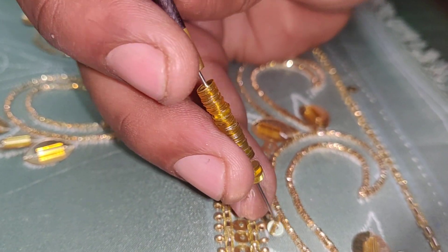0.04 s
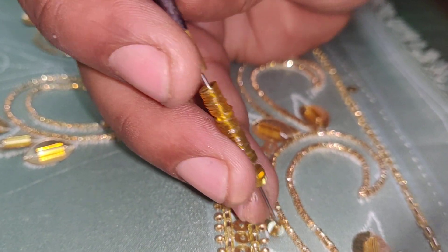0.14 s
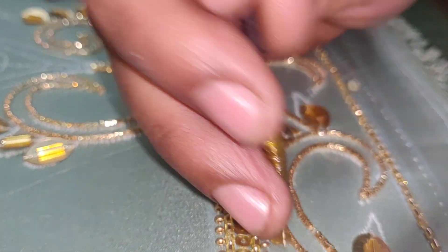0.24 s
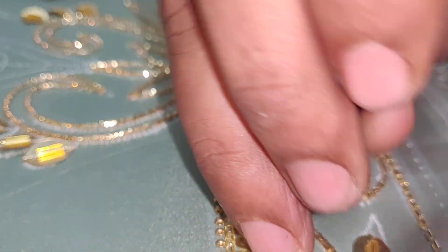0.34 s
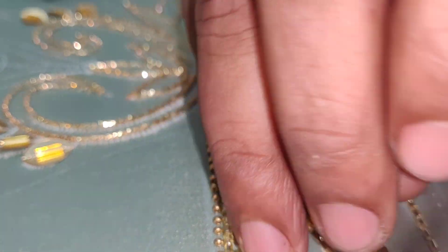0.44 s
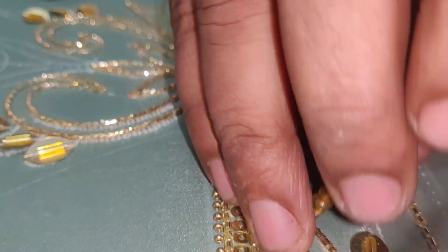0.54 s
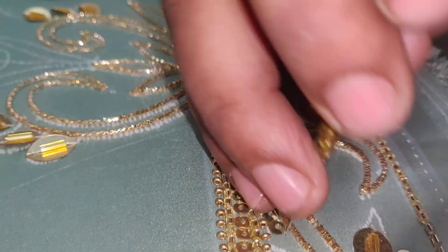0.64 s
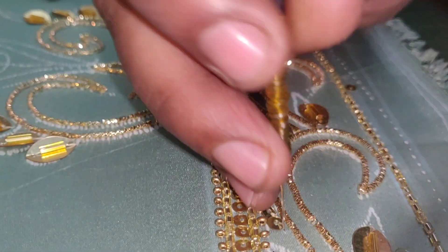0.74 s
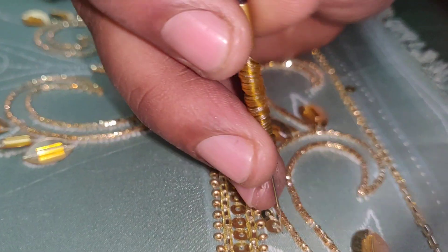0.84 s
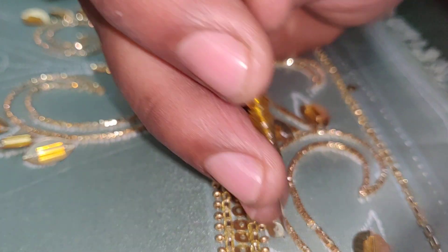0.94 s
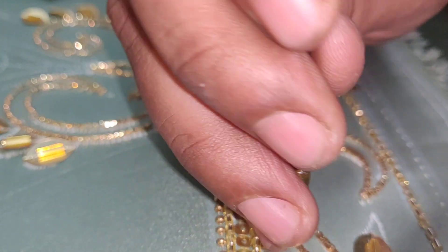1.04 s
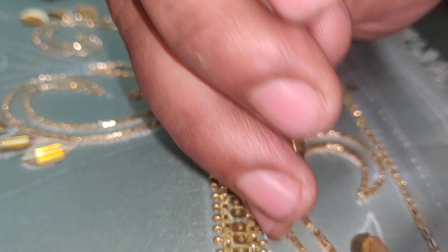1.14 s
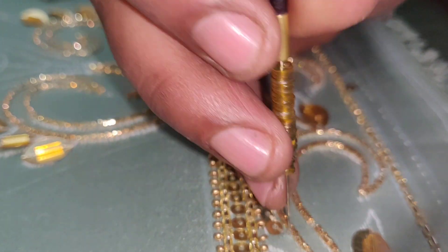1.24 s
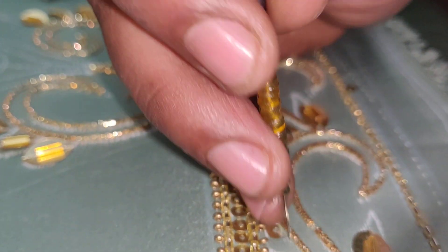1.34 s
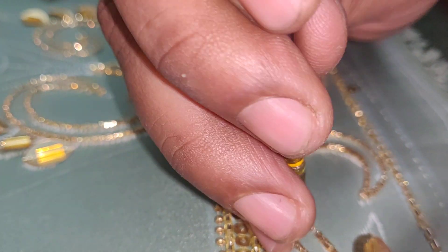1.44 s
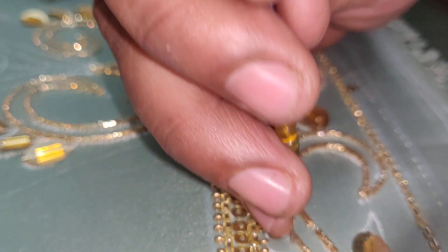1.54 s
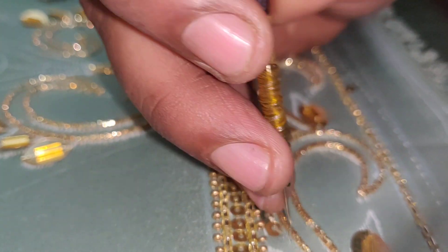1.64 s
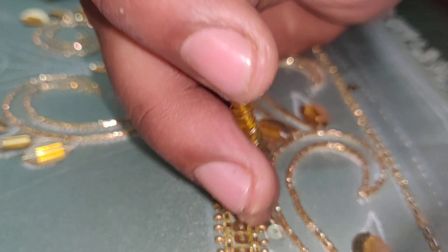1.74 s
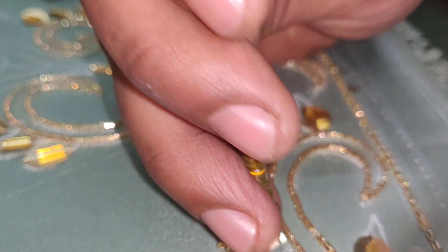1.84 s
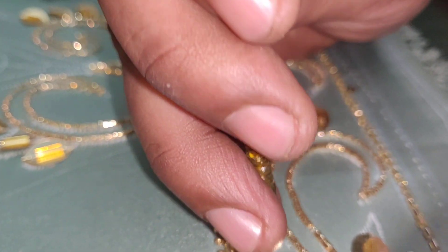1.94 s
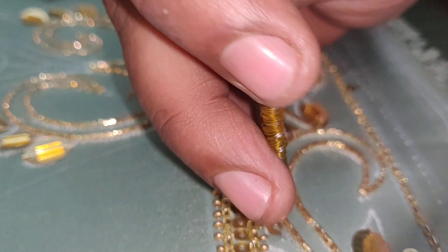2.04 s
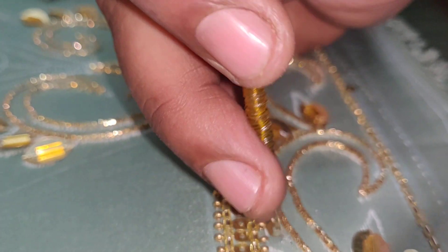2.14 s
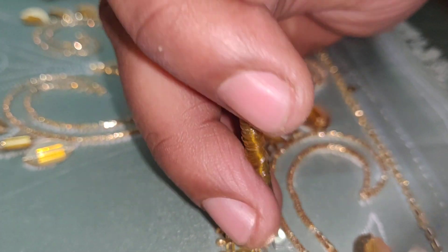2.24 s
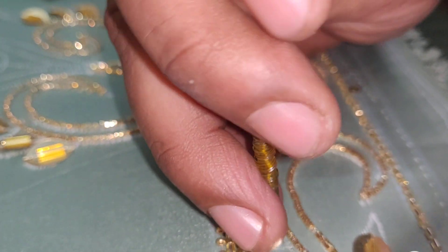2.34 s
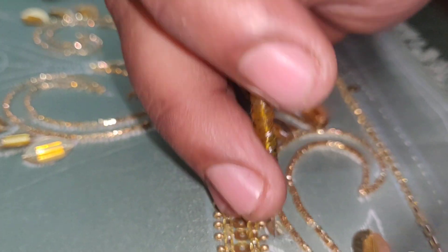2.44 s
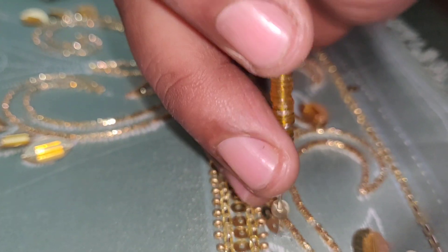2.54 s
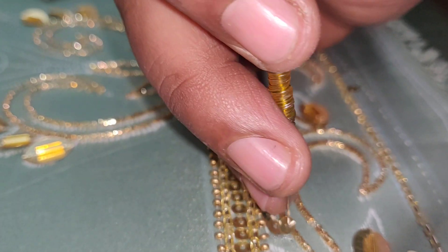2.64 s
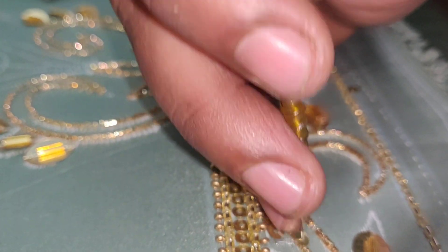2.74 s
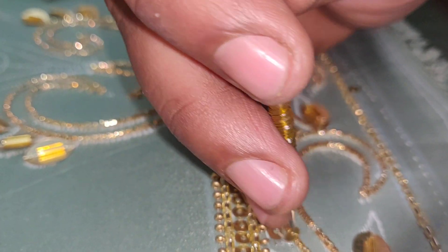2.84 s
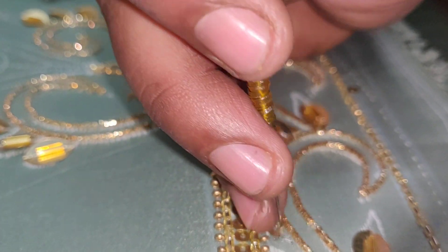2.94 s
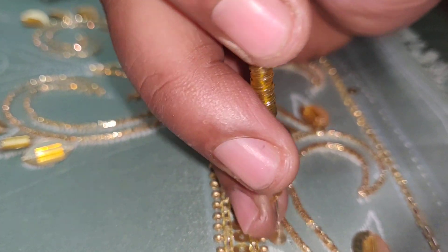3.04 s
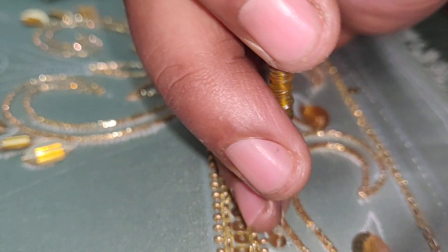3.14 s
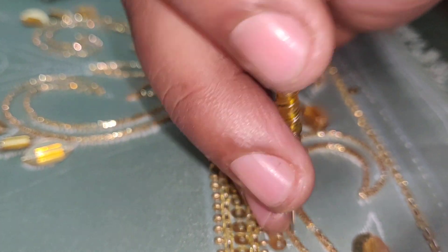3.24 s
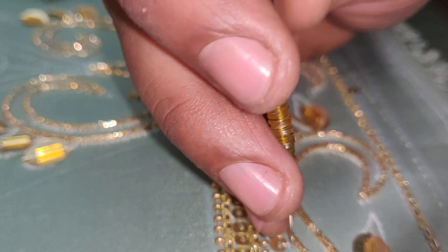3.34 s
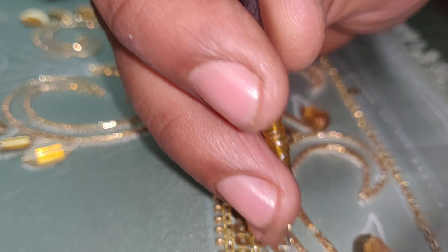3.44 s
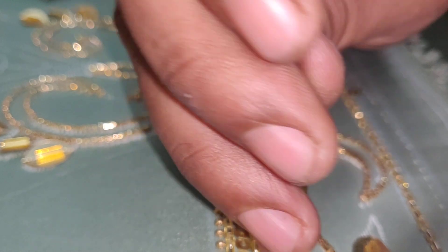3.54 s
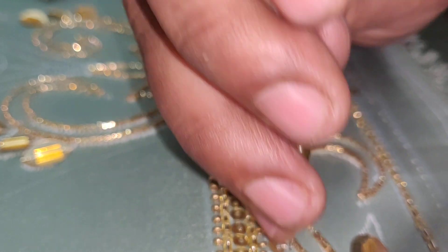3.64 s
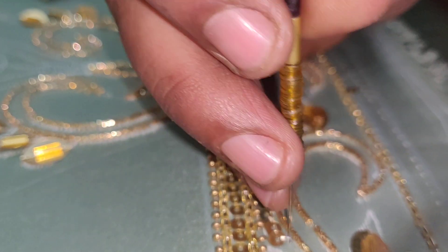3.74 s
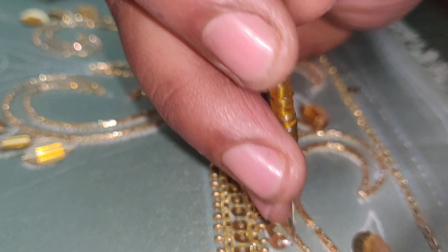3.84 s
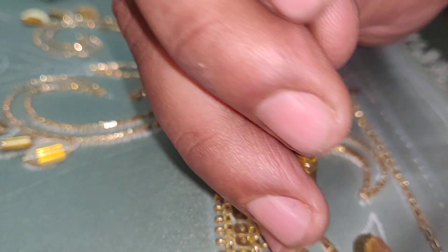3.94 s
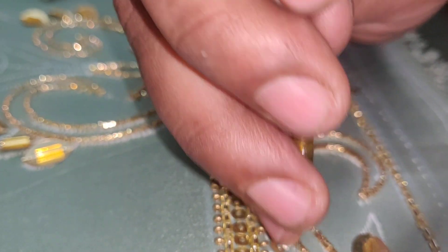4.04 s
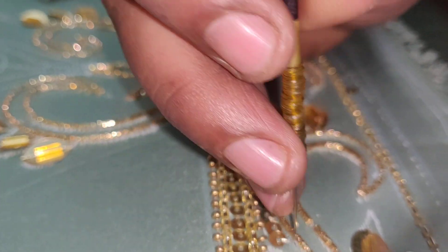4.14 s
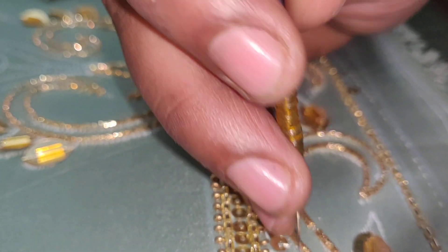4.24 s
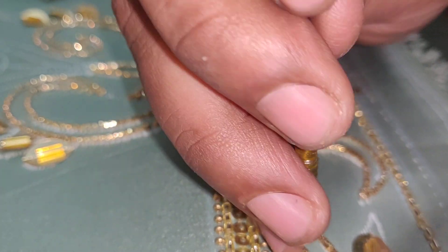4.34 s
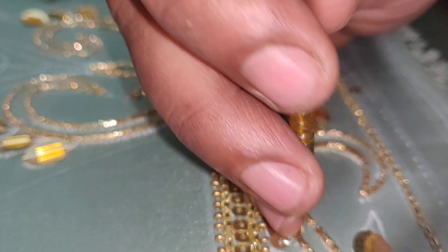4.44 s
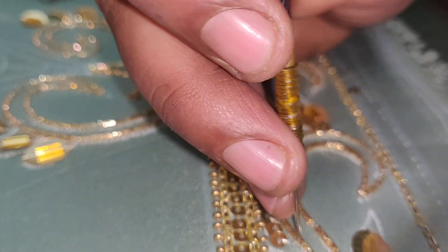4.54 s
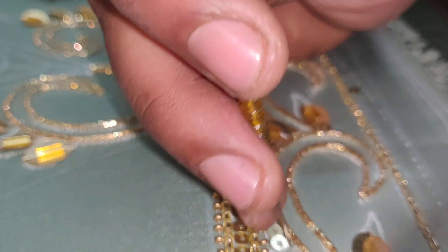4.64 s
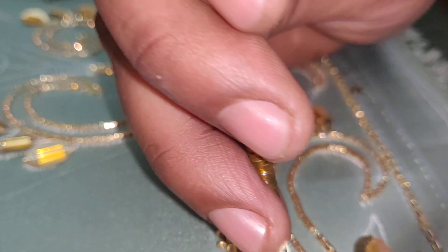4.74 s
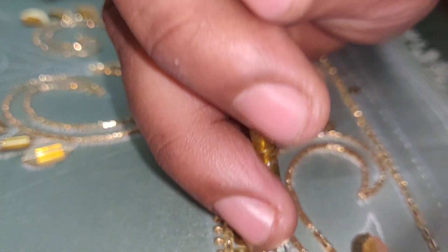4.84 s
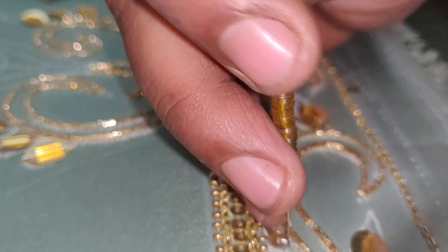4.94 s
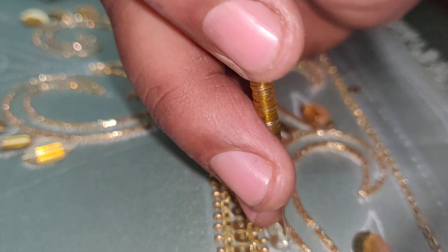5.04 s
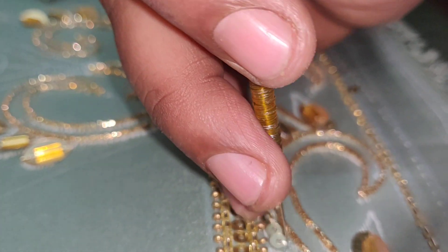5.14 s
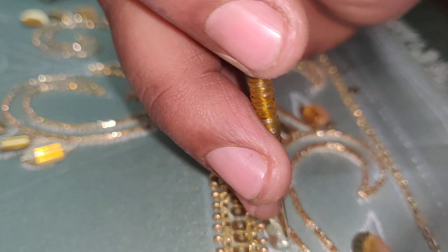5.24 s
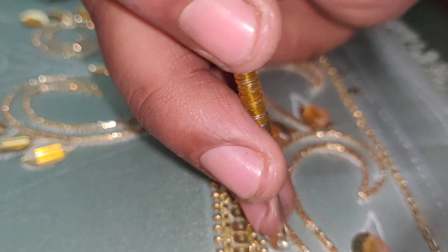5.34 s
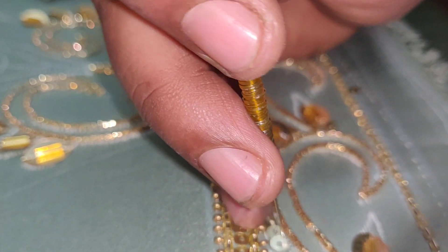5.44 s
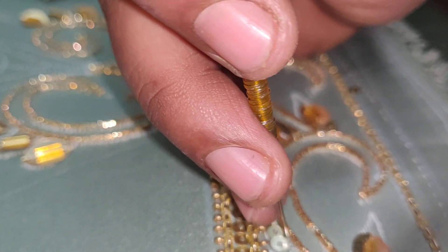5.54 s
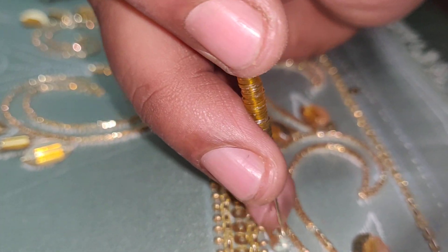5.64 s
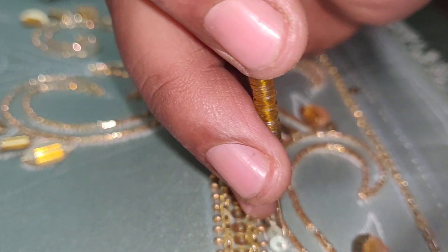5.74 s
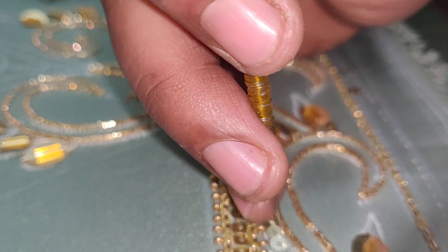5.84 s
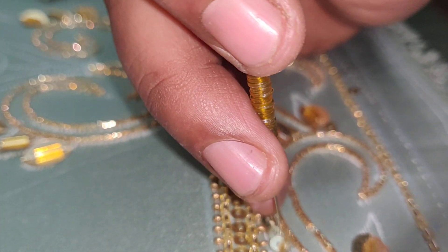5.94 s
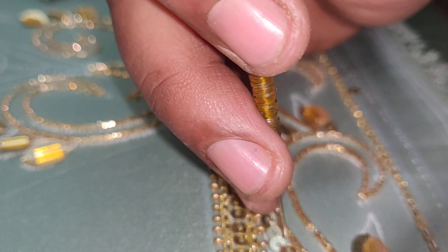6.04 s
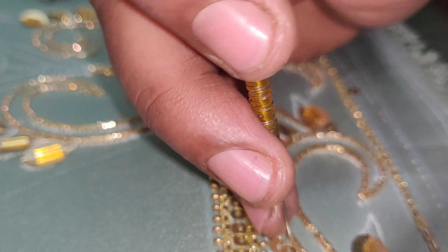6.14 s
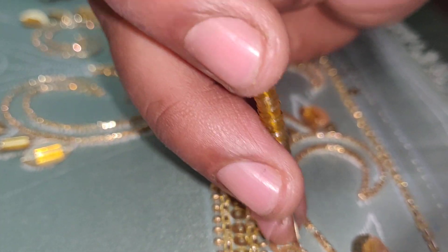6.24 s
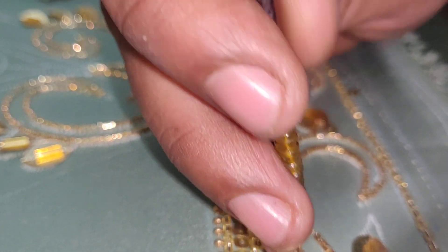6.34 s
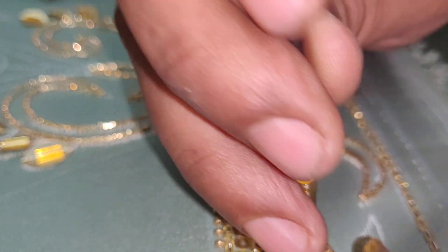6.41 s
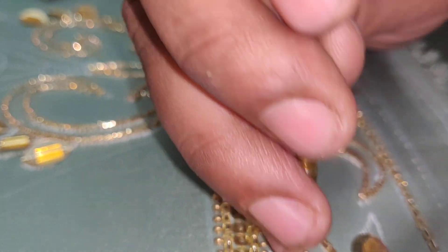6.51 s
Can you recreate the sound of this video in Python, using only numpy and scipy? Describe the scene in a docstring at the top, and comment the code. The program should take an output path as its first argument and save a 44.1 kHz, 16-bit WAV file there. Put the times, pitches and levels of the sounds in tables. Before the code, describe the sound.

A hooked needle works on tightly stretched, sequined cloth right beside a phone, slightly left, in a quiet small room. A hard snap with a drum-like thump comes at 0.2 s, then scratchy finger rubs and thread hiss. From 0.7 to 1.8 s bright clicks arrive irregularly, often doubled, each with a dry beady rattle and low springy thud. Tiny ticks sound near 1.9 and 2.3 s, with strong pops around 2.0, 2.2 and 2.5 s. From 2.8 to 3.9 s the clicks are lighter, mixed with rubbing. A dense, louder cluster runs from 4.1 to 4.9 s, sharpest near 4.1, 4.45 and 4.7 s. From 5 to 6.2 s it is nearly still: faint brushing, small ticks near 5.9 s and soft hiss. Loud snaps and thumps return at 6.4 and 6.55 s.

```python
"""Hooked needle on sequined sheer fabric

A hooked needle stitches sequins onto sheer cloth stretched on a frame, right beside a phone in a quiet small room.
Breaking through or pulling free, it creaks and snaps (shaped noise), rattles and thumps (decaying modes).
Thread and fingers rub (noise with fibre catches), sequins tick (resonated noise), nudges thud (lowpassed thump).
The cloth sways (low noise driven by each push) over a still-air hiss, with a faint tail from the walls."""
import sys
import numpy as np
from scipy import signal
from scipy.fft import rfft, irfft, next_fast_len
from scipy.io import wavfile
from scipy.ndimage import uniform_filter1d, minimum_filter1d, map_coordinates

SR = 44100
rng = np.random.default_rng(int(sys.argv[2]) if len(sys.argv) > 2 else 0)


def master(y):
    """Save y as 16-bit WAV."""
    cut = np.clip(np.atleast_2d(y).T, -1, 1)
    pcm = np.round(cut * 32767)  # scale
    wavfile.write(sys.argv[1], SR, pcm.astype(np.int16))


N = 289957


def amp(db):
    """Decibels to amplitude."""
    return 10 ** (np.asarray(db) / 20)


def unit(x, size=None):
    """Scale to rms 1 over the first size samples."""
    return x / np.sqrt(np.mean(x[..., :size] ** 2) + 1e-20)


def along(points, hz):
    """Interpolate (Hz, value) points on a log axis."""
    point_hz, value = np.transpose(points)
    return np.interp(np.log(hz + 1), np.log(point_hz + 1), value)


def curves(rows):
    """One value per sample for each column after the time."""
    s, *columns = np.transpose(rows)
    return [np.interp(np.arange(N) / SR, s, column) for column in columns]


def wobble(rate_hz):
    """A smooth random curve, rate_hz knots a second."""
    knots = rng.standard_normal(int(N * rate_hz / SR) + 4)
    return map_coordinates(knots, [np.arange(N) * rate_hz / SR])


def filtered(x, response):
    """x times a response of frequency."""
    size = next_fast_len(N + SR // 2)
    spectrum = rfft(x, size) * response(np.fft.rfftfreq(size, 1 / SR))
    return irfft(spectrum, size)[..., :N]


def coloured(x, points):
    """x shaped by a (Hz, dB) spectrum."""
    return filtered(x, lambda hz: amp(along(points, hz)))


def impulse(points, size=1024):
    """Causal impulse response of a (Hz, dB) spectrum, by folding its cepstrum."""
    cepstrum = irfft(np.log(amp(along(points, np.fft.rfftfreq(size, 1 / SR)))))
    cepstrum[1:size // 2] *= 2
    cepstrum[size // 2 + 1:] = 0
    return irfft(np.exp(rfft(cepstrum)))


def pan(left_over_right_db):
    """Left and right gains of mean power 1."""
    return unit(amp([[left_over_right_db / 2], [-left_over_right_db / 2]]))


def pair(apart, size=N):
    """Two noises: a common part, and apart times as much of each port's own."""
    z = rng.standard_normal((3, size))
    return unit(z[0] + apart * z[1:])


def add(track, s, sound):
    """Mix a sound in at s seconds."""
    i = max(round(s * SR), 0)
    part = track[:, i:i + sound.shape[1]]
    part += sound[:, :part.shape[1]]


def ring(hz, db, t60_s, t, detune, scatter_db):
    """Decaying modes; tension and the place of the stitch change pitch and strength."""
    level_draw, pitch_draw = rng.standard_normal((2, len(hz), 1))
    hz, db, t60_s = (np.reshape(v, (-1, 1)) for v in (hz, db, t60_s))
    envelope = amp(db + scatter_db * level_draw - 60 * t / t60_s)
    return np.sum(envelope * np.sin(2 * np.pi * hz * (1 + detune * pitch_draw) * t), 0)


# still air spectrum: freq_hz, level_db (per Hz)
AIR_SPECTRUM = [(15, -9), (30, -3), (60, -15.5), (120, -14.5), (230, -18), (340, -25), (450, -21.5),
                (680, -29.5), (850, -25.5), (1150, -33.5), (1500, -31), (2600, -39), (4600, -38),
                (8000, -41), (10500, -51.5), (15000, -47.5), (16500, -96)]
AIR_DB = -52  # before the left resonance


def air():
    """The still room and the microphones' own hiss; the left port resonates in the treble."""
    hush = unit(coloured(pair(2.17), AIR_SPECTRUM))
    hush[0] += 2.0 * signal.lfilter(*signal.iirpeak(6250, 6.0, SR), hush[0])
    return amp(AIR_DB) * hush


# swaying cloth spectrum: freq_hz, level_db (per Hz)
SWAY_SPECTRUM = [(3, -16.5), (11, 21.5), (20, -1.5), (30, 2), (44, -1), (80, -6), (120, -18), (200, -22.5),
                 (400, -34), (900, -120)]
REST_DB, LEAN_DB = -35, 10  # sway at rest; sway over finger pressure
STITCH_SWAY_DB, NUDGE_SWAY_DB = 0.5, 8.5  # over thump_db of a stitch; over level_db of a nudge
PUSH_S, SETTLE_S = 0.031, 0.053  # the hand bears down; the cloth settles
FRAME_S, FRAME_DB = 0.45, -12.5  # the frame rocks on more weakly


def sway(finger):
    """Every push of the hand sets the cloth heaving; it fans air at the nearer port and settles."""
    t = np.arange(0, N, SR // 200) / SR
    pushes = [(s, thump_db + STITCH_SWAY_DB) for s, _, _, thump_db, _ in STITCHES]
    pushes += [(s, db + NUDGE_SWAY_DB) for s, db in NUDGES]
    power = amp(REST_DB) ** 2
    for s, db in pushes:
        age_s = np.maximum(t - s, 0)
        bearing_down = np.exp(np.minimum(t - s, 0) / PUSH_S)
        settling = np.exp(-age_s / SETTLE_S) + amp(FRAME_DB) * np.exp(-age_s / FRAME_S)
        power = power + (amp(db) * bearing_down * settling) ** 2
    heave, = curves(np.column_stack([t, np.sqrt(power)]))
    level = np.hypot(heave, amp(LEAN_DB) * finger)
    return level * pan(10.8) * unit(coloured(pair(2.1), SWAY_SPECTRUM))


# strokes of thread and fingers: start_s, end_s, finger_pressure_db, thread_pull_db
STROKES = [(0.166, 0.183, -54, -60.5), (0.217, 0.35, -48.5, -58.5), (0.372, 0.439, -46, -52),
           (0.437, 0.465, -37, -54), (.508, 0.556, -48.5, -58), (0.556, 0.642, -38.5, -53.5),
           (0.9, 0.987, -52, -61), (1.02, 1.151, -44, -58.5), (1.25, 1.334, -70, -65),
           (1.353, 1.449, -41.5, -58), (1.49, 1.564, -47, -58), (1.758, 1.798, -34.5, -58),
           (1.836, 1.903, -60, -60), (1.94, 1.997, -45, -61.5), (2.263, 2.34, -53, -67),
           (2.363, 2.455, -44, -62.5), (2.781, 2.847, -51, -59.5), (3.277, 3.333, -40.5, -55.5),
           (3.417, 3.584, -42.5, -61), (3.6, 3.688, -49, -55.5), (3.844, 3.951, -42, -59.5),
           (3.953, 3.999, -39.5, -59), (4.012, 4.049, -39.5, -52), (4.3, 4.422, -46, -64),
           (4.7, 4.795, -53.5, -64), (4.822, 4.868, -50, -58), (5.105, 5.135, -50, -72),
           (5.182, 5.253, -55, -72.5), (5.66, 5.718, -50.5, -63), (6.216, 6.308, -48.5, -67.5),
           (6.489, 6.52, -38, -61.5)]


def pressing():
    """Finger pressure and thread pull: each stroke swells, holds and lets go."""
    t, edge_s = np.arange(N) / SR, 0.014
    pressure = np.zeros((2, N))
    for start_s, end_s, *levels_db in STROKES:
        near = slice(max(int((start_s - edge_s) * SR), 0), int((end_s + edge_s) * SR))
        inside_s = np.minimum(t[near] - start_s, end_s - t[near])
        swell = np.clip(0.5 + inside_s / edge_s, 0, 1)
        pressure[:, near] += amp(levels_db)[:, None] * swell
    return pressure


CATCH_DB = -6.5


def slipping(apart, rough_db, catches):
    """Friction noise: slips make its level flicker fast, and now and then a fibre catches."""
    slips = pair(apart) * amp(rough_db * wobble(800))
    return slips + amp(CATCH_DB) * unit(catches)


# fingertip on taut cloth: freq_hz, level_db (per Hz)
BRUSH_SPECTRUM = [(40, -68), (110, -0.5), (210, 3.5), (400, -9.5), (600, -42), (1500, -25), (4000, -120)]
# scraped weave: freq_hz, level_db (per Hz)
SCRAPE_SPECTRUM = [(100, -35), (450, 4), (650, 2), (900, 9), (1200, -3.5), (1600, 1), (2400, -5),
                   (3000, -9), (4500, -11), (7000, -58), (12000, -120)]
# thread hiss at each port: freq_hz, level_db (per Hz)
HISS_LEFT_SPECTRUM = [(1500, -38), (3500, -35), (4700, -1.5), (5400, -0.5), (6100, 9), (7000, -4),
                      (8700, -35), (9800, -37), (14500, -36), (16000, -68)]
HISS_RIGHT_SPECTRUM = [(1500, -41), (3900, -11.5), (5300, -9), (6300, -10), (7600, -15), (8800, -8.5),
                       (10300, -29), (14800, -37), (16000, -44)]
SCRAPE_DB, SCRAPE_FINGER_SHARE = -2, 0.63  # finger and thread scrape the weave together
CATCH_RATE_HZ, CATCH_SCATTER_DB = 70, 6.5
FLUTTER_DB, FLUTTER_RATE_HZ = 3, 27  # the hand never presses quite evenly


def rubbing(finger, thread):
    """Stroke by stroke, fingertips brush and scrape the weave while the thread hisses through it."""
    catches = (rng.random(N) < CATCH_RATE_HZ / SR) * amp(CATCH_SCATTER_DB * rng.standard_normal(N))
    brush_noise = slipping(0.58, rough_db=3.0, catches=catches)
    brush = amp(1.5) * pan(8.4) * unit(coloured(brush_noise, BRUSH_SPECTRUM))
    scrape_noise = slipping(0.62, rough_db=1.0, catches=catches)
    scrape = amp(SCRAPE_DB) * pan(5.0) * unit(coloured(scrape_noise, SCRAPE_SPECTRUM))
    left, right = slipping(1.0, rough_db=2.5, catches=catches)
    hiss = np.array([coloured(left, HISS_LEFT_SPECTRUM), coloured(right, HISS_RIGHT_SPECTRUM)])
    hiss = amp(7) * unit(hiss)
    both = finger ** SCRAPE_FINGER_SHARE * thread ** (1 - SCRAPE_FINGER_SHARE)
    flutter = unit(amp(FLUTTER_DB * wobble(FLUTTER_RATE_HZ)))
    return flutter * (finger * brush + both * scrape + thread * hiss)


# thread and sequin ticks: start_s, level_db, pitch_hz
TICKS = [(.1927, -50, 6200), (1.852, -43, 2440), (1.86, -40, 2530), (1.8842, -46.5, 2430),
         (2.3028, -40, 2400), (2.3322, -44.5, 2570), (2.36, -51, 2410), (5.44, -52, 2050), (5.7, -49, 1580),
         (5.909, -51, 5960), (5.943, -47, 6000), (5.9544, -40.5, 6400)]


def ticks():
    """Thread slips over the hook and sequins touch: tiny broad rings with no thump."""
    out, t = np.zeros((2, N)), np.arange(SR // 20) / SR
    for s, db, hz in TICKS:
        body = signal.iirpeak(hz, 1.8, SR)
        burst = pair(1.0, size=len(t)) * amp(-60 * t / 0.017)
        ringing = signal.lfilter(*body, signal.lfilter(*body, burst))
        add(out, s, amp(db) * pan(1.5) * unit(ringing, size=150))
    return out


def strain(ports, rise_s, size=900):
    """Fibres creak more and more as the point presses on them, just before they give."""
    t = np.arange(-size, 0) / SR
    creak = signal.fftconvolve(pair(0.17, size=size), ports, axes=1)[:, :size]
    return unit(creak) * np.exp(t / rise_s)


def snap(t, ports, first, tear_s):
    """A first fibre lets go, others follow for a moment, and the sequins shiver."""
    tearing = np.exp(-(t / tear_s) ** 4)
    shiver = amp(-7 - 60 * t / 0.021)
    slips = pair(0.84, size=len(t)) * (tearing + shiver)
    slips[:, 0] += first
    sound = signal.fftconvolve(slips, ports, axes=1)[:, :len(t)]
    return np.array([unit(side, size=150) for side in sound])


# modes of needle, handle and beaded work: freq_hz, level_db
RATTLE_MODES = [(335, 9), (560, 2.5), (740, -2.5), (820, 16.5), (975, 10.5), (1290, -23), (1450, 3.5),
                (1720, 13), (2150, -5.5), (2400, 17), (2780, 1)]
RATTLE_MAIN_HZ, RATTLE_DAMPING = 820, 0.5  # modes above the main one die faster, by this power of pitch


def rattle(t, t60_s, colour):
    """The needle and the beadwork ring briefly under a dry crunch."""
    burst = pair(0.49, size=len(t)) * amp(-60 * t / t60_s)
    crunch = signal.fftconvolve(burst, colour[None], axes=1)[:, :len(t)]
    hz, db = np.transpose(RATTLE_MODES)
    mode_t60_s = t60_s * (RATTLE_MAIN_HZ / hz) ** RATTLE_DAMPING
    modes = ring(hz, db, mode_t60_s, t, detune=0.031, scatter_db=3.5)
    return unit(amp(-2.0) * unit(modes, size=220) + unit(crunch, size=220), size=220)


# modes of the stretched cloth: freq_hz, level_db, t60_s
CLOTH_MODES = [(44.3, -21, 1), (78.2, -13.5, 0.36), (136.2, -6.5, 0.12), (202.1, 0, 0.08),
               (218.6, -15.5, 0.21), (242.5, 5, 0.034), (373, -5, 0.049), (412.2, -21, 0.17),
               (591, -21, 0.14)]


def thump(t, spread_s):
    """The cloth springs back like a drum skin; the ripple reaches the right port later."""
    skin = unit(ring(*np.transpose(CLOTH_MODES), t, detune=0.048, scatter_db=0.5), size=350)
    return np.array([skin, np.interp(t - spread_s, t, skin)])


# needle breaks through or hook pulls free; rattle and thump before the gains below:
# start_s, snap_db, rattle_db, thump_db, snap_left_over_right_db
STITCHES = [(.2072, -11, -29, -22.5, 6.5), (0.222, -22, -27.5, -40, 8), (0.3351, -23, -27.5, -30.5, 9),
            (.4537, -51, -34.5, -54, 2), (0.6851, -18.5, -36, -21.5, 7.5), (0.7235, -16.5, -26, -20, 3.5),
            (0.8148, -29.5, -27.5, -65, 31), (0.9726, -19, -26, -28.5, 16), (0.9759, -23, -30.5, -22.5, 18),
            (1.174, -21, -31, -27, 9), (1.1976, -19.5, -29, -19, 9.5), (1.371, -34, -38.5, -29, 4),
            (1.3849, -25, -30.5, -37.5, -1.5), (1.442, -38, -38.5, -37.5, 12),
            (1.522, -32.5, -30.5, -52, 9), (1.5773, -17, -29, -20.5, 12.5), (1.6386, -33.5, -44, -51, 10),
            (1.7813, -14.5, -26.5, -22, 4), (2.018, -25, -35.5, -29.5, 3.5), (2.046, -24.5, -33, -23, 6.5),
            (2.207, -39, -41, -32.5, 7), (2.2306, -15, -26.5, -18.5, 5), (2.465, -34.5, -46, -37.5, -1),
            (2.4918, -19.5, -34.5, -24, 10), (2.816, -37, -43.5, -70, 25), (2.9352, -27, -36, -47.5, 7.5),
            (3.0498, -31, -35, -35.5, 11), (3.1384, -36.5, -52, -58, 7), (3.319, -32, -34.5, -38, 19),
            (3.349, -26, -44.5, -41.5, 13.5), (3.4345, -41, -42, -50, 19), (3.6495, -26, -37, -33.5, 10.5),
            (3.6755, -26, -33.5, -25.5, 10), (3.6919, -32, -39.5, -26.5, 6),
            (3.8515, -27, -34.5, -43.5, 7.5), (3.8722, -30.5, -42.5, -37, 10), (3.879, -32, -34, -29.5, 15),
            (4.0743, -26.5, -29.5, -23, 10), (4.099, -16.5, -21, -16.5, 10.5),
            (4.1866, -24, -39.5, -54, 12), (4.2321, -37.5, -50, -52, 13), (4.2669, -22, -27.5, -30, 10),
            (4.2793, -25, -26.5, -21.5, 9), (4.454, -21, -24.5, -17.5, 7), (4.468, -24.5, -30.5, -25, 12),
            (4.526, -41.5, -56, -68, 5), (4.6746, -27.5, -40, -30, 11), (4.681, -14.5, -28, -19, 5.5),
            (4.8902, -31.5, -40.5, -34.5, 3), (4.9113, -28.5, -34, -29, 2), (4.9229, -25, -29.5, -21, 6),
            (6.3897, -15.5, -20.5, -25.5, 2.5), (6.392, -26.5, -31, -17.5, 20), (6.56, -16, -21, -15.5, 1)]
# snap colour at each port: freq_hz, level_db
SNAP_LEFT_SPECTRUM = [(200, -20), (900, -28), (2300, -6.5), (3000, -14.5), (3750, -8), (4300, -10),
                      (5200, 0.5), (6050, 7.5), (6900, -0.5), (8500, -18.5), (10700, -49.5), (12000, -34),
                      (15300, -28), (17000, -32)]
SNAP_RIGHT_SPECTRUM = [(200, 1), (900, -4), (2300, -7.5), (3000, -8.5), (4100, 6.5), (5600, -4.5),
                       (6700, 16), (7600, 8.5), (8800, 10.5), (10200, -11), (11700, -16.5), (14200, -7.5),
                       (15300, -3.5), (17000, -24.5)]
# weave crunching round the needle: freq_hz, level_db (per Hz)
CRUNCH_SPECTRUM = [(120, -10.5), (300, 5), (500, 2.5), (680, 1), (900, 5), (1500, -2.5), (2400, -5),
                   (3000, -13.5), (3700, -5.5), (4800, -14.5), (8000, -30), (12000, -63)]
CREAK_DB, RATTLE_DB, DRUM_DB = -29, 0, 5.5  # creak over the snap; gains of rattle and thump
RATTLE_T60_S = 0.057  # main mode and crunch


def stitches():
    """Each contact strains, snaps, rattles and lets the cloth spring back."""
    out, t = np.zeros((2, N)), np.arange(SR // 4) / SR
    ports = np.array([impulse(SNAP_LEFT_SPECTRUM), impulse(SNAP_RIGHT_SPECTRUM)])
    crunch = impulse(CRUNCH_SPECTRUM)
    for s, snap_db, rattle_db, thump_db, side_db in STITCHES:
        creak = amp(snap_db + CREAK_DB) * pan(side_db) * strain(ports, rise_s=0.0044)
        click = amp(snap_db) * pan(side_db) * snap(t, ports, first=1.6, tear_s=0.0024)
        body = amp(rattle_db + RATTLE_DB) * pan(3.8) * rattle(t, RATTLE_T60_S, crunch)
        drum = amp(thump_db + DRUM_DB) * pan(5.0) * thump(t, spread_s=0.0005)
        add(out, s - creak.shape[1] / SR, creak)  # ends as the snap starts
        add(out, s, click + body - drum)
    return out


# t60 of the walls: freq_hz, t60_s
ROOM_DECAY = [(150, 0.088), (1000, 0.35), (6000, 0.21), (15000, 0.37)]


def room(x):
    """A faint tail from the walls, dull on top, each frequency dying at its own speed."""
    hz, t, z = signal.stft(rng.standard_normal((2, SR // 2)), SR, nperseg=256)
    decay = amp(-60 * t / along(ROOM_DECAY, hz)[:, None])
    tail = signal.istft(z * decay, SR, nperseg=256)[1]
    dull = coloured(x.mean(0), [(1000, 2.5), (6000, 0.0), (8500, -4), (15000, -19)])
    late = np.pad(dull, (SR // 200, 0))  # 5 ms
    return signal.fftconvolve(late[None], tail / np.linalg.norm(tail[0]), axes=1)[:, :N]


# fingertip nudges on the cloth: start_s, level_db
NUDGES = [(.379, -29.5), (1.055, -35), (1.096, -34), (1.551, -30), (1.98, -33), (2.443, -25.5),
          (2.653, -32.5), (3.424, -40), (3.568, -29.5), (3.603, -35), (3.986, -32.5), (4.853, -34),
          (5.2, -40)]


def nudges():
    """A fingertip is soft, so it stirs mainly the lowest modes of the cloth."""
    out, t = np.zeros((2, N)), np.arange(SR // 4) / SR
    pad = signal.butter(2, 129.0 / (SR / 2), output="sos")
    for s, db in NUDGES:
        soft = signal.sosfilt(pad, thump(t, spread_s=0.0002))
        add(out, s, amp(db) * pan(10.5) * unit(soft, size=700))
    return out


def scene():
    """The work lies nearer the left port, so the right one hears it a little later."""
    finger, thread = pressing()
    work = stitches() + ticks() + nudges() + rubbing(finger, thread)
    work[1] = np.roll(work[1], round(0.00011 * SR))
    return work + amp(-18.5) * room(work) + sway(finger) + air()


TOP_HZ = 16700  # middle of an 800 Hz wide slope


def record(dry):
    """The phone's fast limiter holds down peaks above 0.92; its band limit cuts the top."""
    needed = np.minimum(1, 0.92 / (np.abs(dry).max(0) + 1e-9))
    gain = uniform_filter1d(minimum_filter1d(needed, size=9), size=9)
    return filtered(dry * gain, lambda hz: np.clip((TOP_HZ - hz) / 800 + 0.5, 0, 1))


dry = scene()
out = record(dry)
master(out)
```